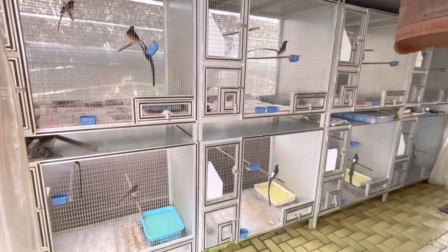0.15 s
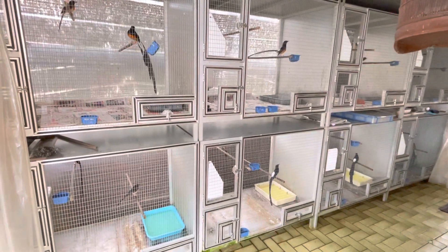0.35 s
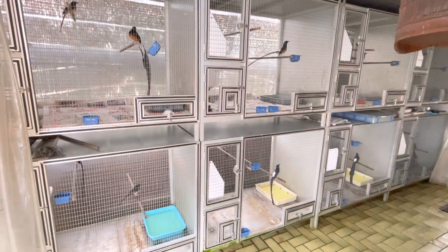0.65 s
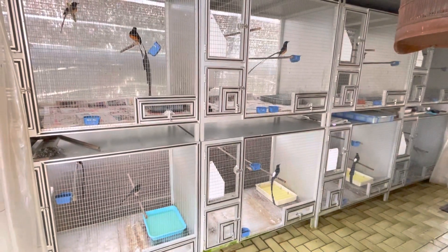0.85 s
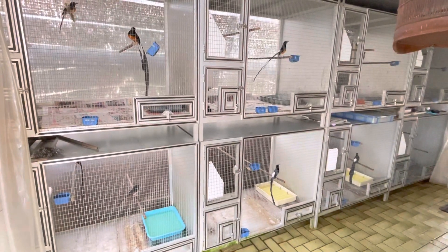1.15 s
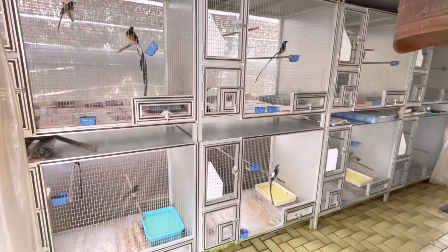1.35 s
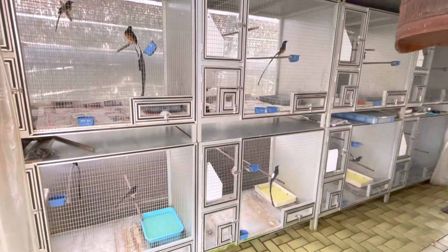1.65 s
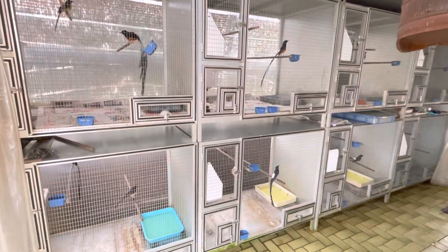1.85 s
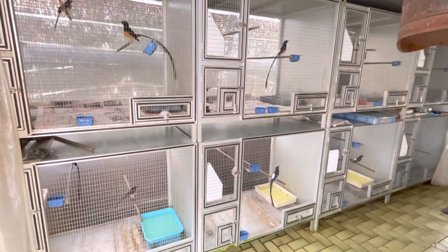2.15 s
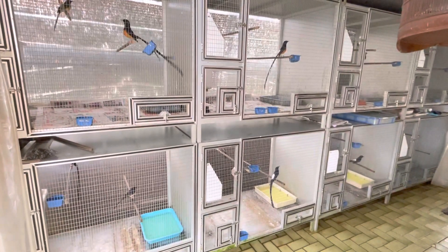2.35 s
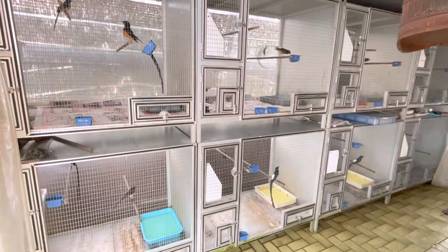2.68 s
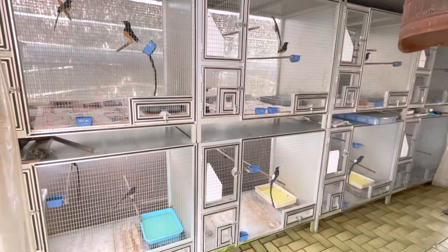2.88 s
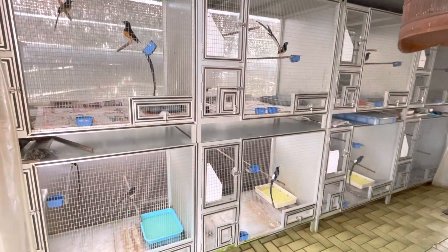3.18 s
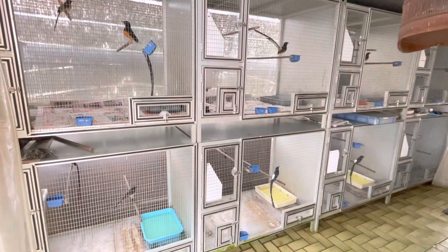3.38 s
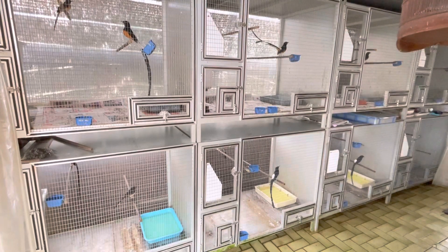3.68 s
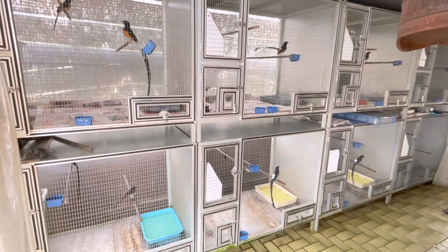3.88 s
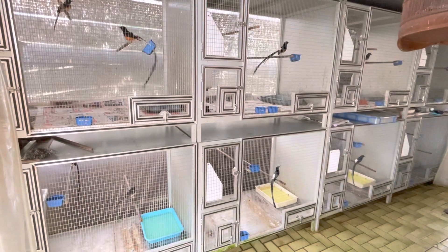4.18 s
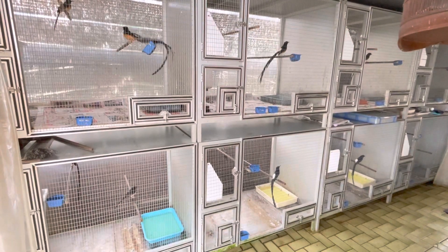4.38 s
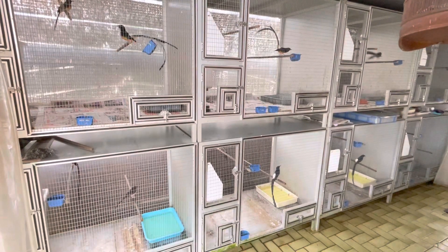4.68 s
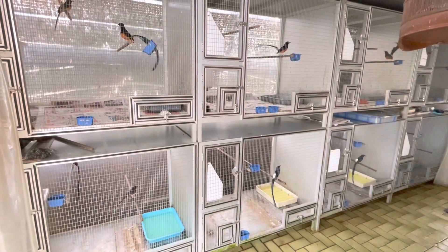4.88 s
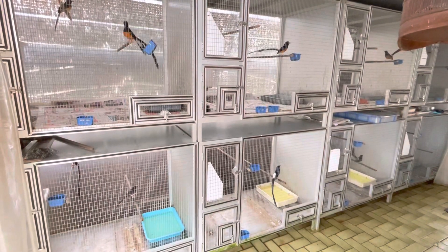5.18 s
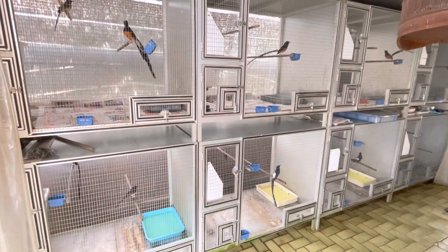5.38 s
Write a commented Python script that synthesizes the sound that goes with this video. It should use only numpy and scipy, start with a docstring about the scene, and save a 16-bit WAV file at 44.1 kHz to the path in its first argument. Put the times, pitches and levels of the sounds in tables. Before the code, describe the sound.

Several caged songbirds whistle, slur and chatter over one another in a hard-walled tiled room, above a low steady machine hum.

```python
"""Caged songbirds in a tiled room

Several long-tailed songbirds whistle, slur and chatter over each other, with a far twitter behind them.
Each note is a gliding, nearly pure tone with weak overtones that rings on between the hard walls.
Harsh buzzes and rasps come from fast pitch sweeps; the ticks, scrapes and wing rustles are shaped noise.
A machine hums steadily under it all as a few wavering sines over coloured room noise."""
import sys
import numpy as np
from scipy import signal
from scipy.fft import rfft, irfft, next_fast_len
from scipy.io import wavfile
from scipy.ndimage import map_coordinates

SR = 44100
rng = np.random.default_rng(int(sys.argv[2]) if len(sys.argv) > 2 else 0)


def bounce(signal):
    """Save signal as a 16-bit WAV file at the path given by the first command-line argument."""
    frames = np.transpose(np.atleast_2d(signal))
    limited = np.clip(frames, -1, 1)
    pcm = np.round(limited * 32767).astype(np.int16)
    wavfile.write(sys.argv[1], SR, pcm)


N = 243873  # length of the scene [samples]


def undb(db):
    """Decibels to amplitude gain."""
    return 10 ** (np.asarray(db) / 20)


def unit(x):
    """Scale to rms 1 over all channels."""
    return x / np.sqrt(np.mean(x ** 2))


def walk(rate, size):
    """Smooth random wander with a spread near 1, through `rate` random points per second."""
    knots = rng.standard_normal(int(size / SR * rate) + 3)
    positions = np.arange(size) / SR * rate
    return map_coordinates(knots, [positions], order=2, mode="nearest")


def colour(x, points):
    """Filter by a spectrum of (frequency [Hz], gain [dB]) points, joined along log frequency."""
    hz, db = np.transpose(points)
    size = next_fast_len(x.shape[-1])
    f = np.maximum(np.fft.rfftfreq(size, 1 / SR), 1)
    gain = undb(np.interp(np.log(f), np.log(hz), db))
    return irfft(rfft(x, size) * gain, size)[..., :x.shape[-1]]


def add(out, start, x):
    """Mix x into out at a time in seconds."""
    i = max(int(start * SR), 0)
    out[..., i:i + x.shape[-1]] += x[..., :max(N - i, 0)]


def pan(x, left_db):
    """Spread a mono sound over both channels, the left one louder by left_db."""
    return x * unit(undb([[left_db], [0]]))


def room(x, wet_db, cage_db, cage_s=0.0097, build_s=0.006, direct_db=-6.0):
    """Direct sound, quick reflections inside the cage and the diffuse ring of the tiled room."""
    t60_s, treble_t60_s, split_hz = 0.47, 0.34, 5000  # the treble dies away sooner
    port_lag_s = 0.00023  # the birds sit nearer to the right microphone port
    t = np.arange(int(.8 * SR)) / SR
    noise = rng.standard_normal((2, len(t)))
    low = signal.sosfilt(signal.butter(2, split_hz, fs=SR, output="sos"), noise)
    high = signal.sosfilt(signal.butter(2, split_hz, "high", fs=SR, output="sos"), noise)
    # the minus sign keeps the two bands from cancelling where they meet
    tail = low * undb(-60 * t / t60_s) - high * undb(-60 * t / treble_t60_s)
    tail = unit(tail * (1 - np.exp(-t / build_s)))
    # slaps off the cage walls: some come from the bird's side and reach both ports alike
    slaps = rng.standard_normal((3, len(t))) ** 3 * np.exp(-t / cage_s)
    cage = unit(slaps[:2] + 0.48 * slaps[2])
    response = (undb(wet_db) * tail + undb(cage_db) * cage) / np.sqrt(len(t))
    response[:, 0] += undb(direct_db)
    response[0] = np.roll(response[0], int(port_lag_s * SR))
    return signal.fftconvolve(x, response, axes=1)[:, :N]


def drone(trim_db=-1):
    """The deep tone of the machine slowly swells and sinks, wavering a little in pitch."""
    # slow course of the drone: (time [s], frequency [Hz], relative level [dB])
    course = [(0.0, 108.4, -43), (0.231, 112.4, -53), (0.73, 110.8, -55.5), (1.09, 111.1, -47),
              (2.57, 111.0, -48.5), (4.53, 110.9, -52), (5.499, 110.9, -43)]
    when, hz, db = np.transpose(course)
    time = np.arange(N) / SR
    phase = 2 * np.pi * np.cumsum(np.interp(time, when, hz) + .5 * walk(5.66, N)) / SR
    return undb(np.interp(time, when, db) + trim_db) * np.sin(phase)


def hum():
    """Further tones of the machine, each a sine wandering slightly in level and pitch."""
    # machine tones: (frequency [Hz], relative level [dB])
    tones = [(57, -55), (262, -48.5), (524, -64.5)]
    out = np.zeros(N)
    for hz, db in tones:
        level = undb(db + 1.5 * walk(13.0, N))
        phase = 2 * np.pi * np.cumsum(hz + .5 * walk(7.88, N)) / SR
        out += level * np.sin(phase)
    return out


def background(air_db=-42.5, wide_hz=600):
    """A steady machine hum over room noise whose bass is alike in both channels."""
    # spectrum of the room noise: (frequency [Hz], relative level [dB])
    air_colour = [(20, -27), (32, -11), (45, 4), (80, 2), (130, -3.5), (220, -3.5), (320, -7.5), (470, -11),
                  (900, -9.5), (1800, -8.5), (3000, -16), (5200, -27), (6300, -24), (7400, -31),
                  (8800, -24.5), (11000, -37), (15000, -38)]
    mid, side = colour(rng.standard_normal((2, N)), air_colour)
    side = signal.sosfilt(signal.butter(1, wide_hz, "high", fs=SR, output="sos"), side)
    air = undb(air_db) * unit(np.array([mid + side, mid - side]))
    machine = np.sqrt(2) * (hum() + drone())
    return air + machine * undb([[.7], [-.7]])  # slightly louder on the left


def syrinx(hz, pressure):
    """A nearly pure tone whose overtones grow when the bird pushes harder."""
    # overtones of the syrinx: (multiple of the pitch, relative level [dB])
    overtone_levels = [(2, -21.5), (3, -35), (4, -57), (5, -35)]
    # colour that beak and throat give the overtones: (frequency [Hz], gain [dB])
    beak = [(2000, -19), (5200, -14), (6300, -9), (7500, 1), (8900, 7), (10000, -3.5), (11300, -4.5),
            (13000, -2), (14700, -10)]
    phase = 2 * np.pi * np.cumsum(hz) / SR
    overtones = sum(undb(db) * np.sin(round(k) * phase)
                    for k, db in overtone_levels if k * hz.max() < SR / 2)
    return np.sqrt(2 * pressure) * (np.sin(phase) + pressure * colour(overtones, beak))


def buzzes(uneven=0.207, left_db=5, force=1.26, dull_hz=10200):
    """The pitch is shaken up and down so fast that the note smears into a rasp."""
    # harsh buzzes: (time [s], length [s], start [Hz], end [Hz], pitch swing [Hz],
    #                mean swing rate [1/s], level ahead of the room [dB])
    calls = [(0.0, 0.044, 5610, 4670, 430, 146, -31), (2.473, 0.031, 4506, 4320, 500, 155, -34),
             (2.496, 0.042, 3814, 2810, 605, 148, -33.5)]
    out = np.zeros(N)
    for start, length, start_hz, end_hz, swing_hz, rate, db in calls:
        size = int(length * SR)
        swings_per_s = rate * (1 + uneven * walk(198.3, size))
        shake = signal.sawtooth(2 * np.pi * np.cumsum(swings_per_s) / SR, .5)  # triangle
        hz = np.linspace(start_hz, end_hz, size) + swing_hz * shake
        note = syrinx(hz, force * signal.windows.tukey(size, .4))
        add(out, start, undb(db) * unit(note))
    out = signal.sosfilt(signal.butter(6, dull_hz, fs=SR, output="sos"), out)
    return room(pan(out, left_db), wet_db=-0.5, cage_db=-1.0)


def whistle(hz, crest, waver_hz=19, rasp=0.00067, harsh=0.015, flutter_db=2.0, edge=0.074, swell_db=5):
    """One note: the pitch follows its contour while the air pressure swells to its crest and falls."""
    size = len(hz)
    u = np.linspace(0, 1, size)
    # high notes that are whipped through a wide range turn rough
    sweep = np.clip(np.ptp(hz) * SR / size / 30000, 0, 1)
    strain = sweep ** 2 * np.clip((hz.max() - 3000) / 1500, 0, 1)
    # a held note wanders a little, so it beats against its own echoes
    hz = hz * (1 + (rasp + harsh * strain) * walk(700, size)) + waver_hz * walk(46.6, size)
    push = np.minimum(u / crest, (1 - u) / (1 - crest))
    db = swell_db * (push - .5) + flutter_db * walk(78.2, size)
    return syrinx(hz, np.sin(np.pi / 2 * push)) * signal.windows.tukey(size, edge) * undb(db)


def glide(length, start_hz, end_hz, bend):
    """Pitch from one note to another: bend 0 is straight, 1 levels off at the end, -1 starts level."""
    u = np.linspace(0, 1, int(length * SR))
    return start_hz + (end_hz - start_hz) * (u + bend * u * (1 - u))


def drop(length, top_hz, bottom_hz):
    """A fall that flicks up, tips over, plunges and levels off at the bottom."""
    hook_share, hook_s = 0.0928, 0.00606  # depth of the flick as a share of the pitch, and its time constant
    lateness = 1.32  # above 1 the plunge comes late
    u = np.linspace(0, 1, int(length * SR))
    hook = 1 - hook_share * np.exp(-u * length / hook_s)
    fall = np.sin(np.pi / 2 * u ** lateness) ** 2
    return hook * top_hz * (bottom_hz / top_hz) ** fall


def quiver(size, per_s=85, uneven=0.258):
    """Fast, uneven up-and-down shake of the pitch, between -1 and 1."""
    return np.sin(2 * np.pi * np.cumsum(per_s * (1 + uneven * walk(58.0, size))) / SR)


def song():
    """Yield each note as (time [s], sound, perch); every kind has its own contour and crest."""
    # Levels stand ahead of the swell, flutter and room; a crest is a share of the note's length.
    # held or evenly gliding: (time [s], length [s], start [Hz], end [Hz], level [dB], perch)
    whistles = [(0.0, 0.067, 2416, 2210, -36, "middle"), (0.199, 0.076, 2404, 2260, -36, "left"),
                (0.272, 0.19, 4450, 4120, -55, "left"), (0.279, 0.11, 1937, 2193, -28.5, "near"),
                (0.39, 0.18, 1910, 2045, -33, "near"), (0.444, 0.081, 2337, 2324, -32.5, "left"),
                (0.534, 0.14, 2096, 2410, -29, "back"), (0.655, 0.04, 3160, 3212, -25.5, "near"),
                (1.247, 0.025, 4470, 4430, -32, "left"), (3.527, 0.025, 2205, 1903, -29.5, "ahead"),
                (0.933, 0.1, 1427, 1440, -38, "back"), (1.574, 0.066, 2582, 2565, -30, "near"),
                (2.769, 0.054, 1403, 1215, -28.5, "middle"), (1.601, 0.16, 3640, 3200, -50, "middle"),
                (1.604, 0.12, 1978, 1950, -30, "ahead"), (1.744, 0.18, 3097, 2852, -28.5, "near"),
                (2.332, 0.085, 2168, 2027, -25.5, "ahead"), (2.452, 0.1, 2610, 2190, -41, "left"),
                (2.564, 0.15, 2273, 2502, -35.5, "left"), (2.66, 0.07, 1522, 1495, -37, "back"),
                (2.699, 0.165, 2496, 2694, -36, "back"), (2.774, 0.0526, 3730, 4200, -47, "near"),
                (3.4, 0.053, 5180, 5050, -50.5, "left"), (3.698, 0.041, 1795, 2114, -22.5, "middle"),
                (3.741, 0.058, 1998, 2750, -21.5, "middle"), (4.736, 0.23, 1577, 1496, -38, "ahead"),
                (5.12, 0.115, 2985, 2856, -26.5, "ahead"), (5.17, 0.092, 1727, 1608, -28.5, "near"),
                (5.429, 0.077, 1912, 1757, -25, "close")]
    # scoop up and level off: (time [s], length [s], start [Hz], top [Hz], level [dB], perch)
    upslurs = [(0.378, 0.06, 2680, 2947, -26.5, "close"), (0.547, 0.12, 3053, 3186, -26, "near"),
               (0.793, 0.071, 2660, 2925, -28.5, "close"), (0.928, 0.057, 1613, 1886, -34, "back"),
               (1.024, 0.037, 1877, 2070, -28.5, "near"), (1.167, 0.051, 2500, 3120, -37.5, "middle"),
               (1.221, 0.026, 3116, 3915, -33.5, "back"), (1.236, 0.045, 1620, 1812, -23, "middle"),
               (1.273, 0.24, 3390, 3804, -46, "back"), (1.356, 0.051, 1684, 1964, -25, "middle"),
               (1.447, 0.049, 2578, 2710, -26, "ahead"), (1.495, 0.09, 2400, 2557, -31.5, "middle"),
               (1.744, 0.052, 960, 1160, -37, "middle"), (2.57, 0.032, 1570, 1720, -34, "back"),
               (2.791, 0.21, 1985, 2563, -33, "back"), (2.993, 0.0404, 3300, 3826, -30, "middle"),
               (3.8, 0.19, 950, 1660, -35, "back"), (4.481, 0.012, 2190, 2840, -29, "near"),
               (4.767, 0.033, 1445, 2122, -25.5, "left"), (4.976, 0.11, 2107, 2916, -23, "left"),
               (5.358, 0.055, 1399, 1974, -23, "middle")]
    # tip over and drop: (time [s], length [s], top [Hz], bottom [Hz], level [dB], perch)
    downslurs = [(.862, 0.039, 2870, 2300, -40, "left"), (1.123, 0.046, 2198, 1815, -33, "back"),
                 (1.246, 0.032, 4520, 2820, -32, "left"), (1.918, 0.037, 1804, 1065, -33, "back"),
                 (2.33, 0.042, 2157, 1156, -36, "ahead"), (2.593, 0.038, 2243, 1440, -33, "back"),
                 (2.73, 0.05, 2054, 1243, -26, "middle"), (3.316, 0.13, 2413, 1061, -27, "back"),
                 (3.507, 0.05, 2445, 1728, -31.5, "ahead"), (3.945, 0.034, 3080, 2120, -28.5, "left"),
                 (4.051, 0.05, 4203, 2676, -26.5, "middle"), (4.204, 0.038, 4205, 2780, -30.5, "near"),
                 (4.21, 0.029, 2113, 1640, -30, "middle"), (4.32, 0.082, 2230, 1056, -30.5, "back"),
                 (4.789, 0.045, 2136, 1570, -32, "left"), (5.317, 0.08, 1700, 1035, -29.5, "back"),
                 (5.441, 0.049, 1794, 1136, -26, "middle")]
    # quiver while gliding: (time [s], length [s], start [Hz], end [Hz], pitch swing [Hz], level [dB], perch)
    warbles = [(1.818, 0.12, 1350, 1832, 125, -36, "middle"), (2.038, 0.11, 1500, 1866, 40, -30.5, "ahead"),
               (2.124, 0.081, 2082, 2167, 205, -32.5, "ahead"),
               (2.599, 0.059, 2050, 1740, 258, -37, "left"), (2.699, 0.07, 1913, 1951, 60, -30.5, "ahead"),
               (2.977, 0.023, 4975, 4800, 69.4, -29, "left"), (2.979, .15, 2880, 3200, 25, -31, "near"),
               (3.065, 0.053, 3970, 4034, 55, -31, "middle"),
               (3.126, 0.086, 3590, 3298, 44.5, -31.5, "middle"),
               (3.164, 0.081, 3195, 3280, 25.2, -33.5, "near"), (3.344, .085, 2280, 1504, 236, -28, "back"),
               (3.82, 0.0753, 2950, 3440, 50, -34.5, "middle"),
               (3.927, 0.031, 2886, 3005, 110, -25, "ahead"), (4.554, .022, 3290, 3170, 328, -31, "near"),
               (4.625, 0.03, 2098, 2300, 109, -27, "middle")]
    # short arched chips: (time [s], top pitch [Hz], level [dB], perch)
    chips = [(0.412, 2960, -28, "near"), (0.984, 1472, -34, "close"), (1.064, 1470, -28.5, "close"),
             (1.121, 1465, -27.5, "close"), (1.426, 2005, -24.5, "ahead"), (1.759, 2648, -27, "middle"),
             (2.101, 1018, -41, "middle"), (2.239, 1066, -39.5, "middle"), (2.368, 1164, -32.5, "middle"),
             (3.685, 2327, -31, "middle"), (3.815, 1048, -33.5, "middle"), (4.119, 1029, -38, "middle"),
             (4.25, 1246, -29.5, "middle"), (4.896, 2994, -41, "back")]

    for start, length, start_hz, end_hz, db, perch in whistles:
        hz = glide(length, start_hz, end_hz, bend=0)
        yield start, undb(db) * whistle(hz, crest=0.53), perch
    for start, length, start_hz, top_hz, db, perch in upslurs:
        hz = glide(length, start_hz, top_hz, bend=.85)
        yield start, undb(db) * whistle(hz, crest=0.76), perch
    for start, length, top_hz, bottom_hz, db, perch in downslurs:
        hz = drop(length, top_hz, bottom_hz)
        yield start, undb(db) * whistle(hz, crest=0.3), perch
    for start, length, start_hz, end_hz, swing_hz, db, perch in warbles:
        hz = glide(length, start_hz, end_hz, bend=0.588)
        yield start, undb(db) * whistle(hz + swing_hz * quiver(len(hz)), crest=0.57), perch
    chip_s, droop = 0.022, 0.058  # both ends of a chip lie under its top by this share
    arch = 1 - droop * np.linspace(-1, 1, int(chip_s * SR)) ** 2
    for start, hz, db, perch in chips:
        yield start, undb(db) * whistle(hz * arch, crest=0.52), perch


def birds():
    """Each perch has its own direction, share of direct sound and echoes."""
    # where the birds sit: label -> (left minus right [dB], direct sound [dB])
    # the labels are only keys: all perches lean left, and "left" is the most echoing one
    perches = {"close": (5.6, 1.8), "near": (6.9, 0.4), "left": (5.1, -9.5), "ahead": (2.8, 0.53),
               "middle": (3.8, -3), "back": (3.1, -5.5)}
    voices = {perch: np.zeros(N) for perch in perches}
    for start, note, perch in song():
        add(voices[perch], start, note)
    return sum(room(pan(voices[perch], left_db), wet_db=1.5, cage_db=-1.0, direct_db=direct_db)
               for perch, (left_db, direct_db) in perches.items())


def far_chatter(count=100, chatter_db=-46):
    """Birds in distant cages blur into a soft twitter, heard mostly through the room."""
    out = np.zeros(N)
    for when, length, pitch, bend, fall in rng.random((count, 5)):
        start_hz = 1450 * 2 ** (.8 * pitch)
        end_hz = start_hz * (1 + .5 * (fall - .5))
        contour = glide(0.0615 + 0.091 * length, start_hz, end_hz, 2 * bend - 1)
        add(out, when * N / SR, whistle(contour, crest=0.95))
    return undb(chatter_db) * unit(room(np.array([out, out]), wet_db=39, cage_db=-1))


def rustles(grain_db=5, stroke_db=5.0):
    """Feathers brush in short grainy bursts; low, middle and high bands each flicker on their own."""
    # rustles of wings: (time [s], length [s], level ahead of taper and room [dB])
    bursts = [(1.228, 0.068, -53.5), (2.481, 0.068, -49.5), (2.679, 0.088, -47), (2.874, 0.093, -46),
              (2.966, 0.073, -45.5), (3.066, 0.096, -54), (3.201, 0.12, -46), (3.612, 0.13, -45),
              (3.906, 0.084, -51), (4.06, 0.24, -59), (4.439, 0.076, -50.5), (4.498, 0.085, -42),
              (4.921, 0.036, -46), (5.129, 0.077, -50)]
    # colour of the rustle: (frequency [Hz], relative gain [dB])
    rustle_colour = [(1200, -18), (3000, 5), (4900, -0.5), (5500, -6), (6300, 7), (7400, -7), (8600, -2),
                     (10500, -13.5), (13000, -17.5), (15000, -11)]
    bands = [(1000, 4500), (4500, 8000), (8000, 17000)]  # [Hz]
    out = np.zeros(N)
    for start, length, db in bursts:
        size = int(length * SR)
        brush = np.zeros(size)
        for edges in bands:
            grain = unit(undb(grain_db * walk(310.0, size) + stroke_db * walk(65, size)))
            band = signal.butter(2, edges, "band", fs=SR, output="sos")
            brush += signal.sosfilt(band, rng.standard_normal(size) * grain)
        burst = unit(colour(brush, rustle_colour)) * signal.windows.tukey(size, .4)
        add(out, start, undb(db) * burst)
    return room(np.array([out * undb(6), out]), wet_db=1.5, cage_db=2.0, direct_db=-3.0)


def rasps(droop=0.352, upper_db=-6.5, rough=0.012, force=2.2, left_db=5):
    """Both sides of the syrinx are whipped up and down within milliseconds; the walls smear the streak."""
    # stuttered syllables: (time [s], length [s], top of lower voice [Hz], top of upper voice [Hz],
    #                       level of both voices together, ahead of the room [dB])
    syllables = [(1.238, 0.019, 3320, 4430, -38), (4.502, .018, 3280, 4730, -26.5),
                 (4.5265, 0.0136, 3650, 4770, -23.5), (4.547, .011, 3590, 4590, -19.5),
                 (4.567, .016, 3380, 4600, -27.5)]
    out = np.zeros(N)
    for start, length, lower_hz, upper_hz, db in syllables:
        size = int(length * SR)
        arch = 1 - droop * np.linspace(-1, 1, size) ** 2
        pressure = force * signal.windows.tukey(size, .3)
        lower = syrinx(lower_hz * arch * (1 + rough * walk(780, size)), pressure)
        upper = syrinx(upper_hz * arch * (1 + rough * walk(780, size)), pressure)
        add(out, start, undb(db) * unit(lower + undb(upper_db) * upper))
    return room(pan(out, left_db), wet_db=-3, cage_db=0.0, direct_db=-4.5)


def ticks(decay_s=0.0032, tick_db=-6):
    """Dry little snaps of beaks and claws that rattle briefly round the cage."""
    # snaps: (time [s], level ahead of tick_db and the room [dB])
    snaps = [(1.466, -30.5), (1.8028, -22), (2.0067, -23), (2.2467, -30), (4.154, -23), (4.3776, -23),
             (4.709, -22), (4.973, -20), (5.173, -25)]
    # colour of a snap: (frequency [Hz], relative gain [dB])
    snap_colour = [(1200, -2.5), (3000, 1.5), (5200, 5.5), (6400, 12.5), (8500, -3.5), (11000, -7),
                   (15000, -10)]
    out = np.zeros(N)
    t = np.arange(int(0.063 * SR)) / SR
    for start, db in snaps:
        noise = unit(colour(rng.standard_normal(len(t)), snap_colour))
        add(out, start, undb(db + tick_db) * noise * np.exp(-t / decay_s))
    return room(np.array([out, out]), wet_db=-5.5, cage_db=5.5, cage_s=0.012)


def scratches(decay_s=0.028, grain_db=5):
    """A bird scrabbles on its perch: claws catch and skid to a stop in a spray of tiny snaps."""
    # one scrape per grip of the claws: (time [s], level ahead of decay and room [dB])
    scrapes = [(4.722, -32.5), (4.741, -31), (4.774, -33.5), (4.787, -41)]
    # colour of a scrape: (frequency [Hz], relative gain [dB])
    scrape_colour = [(1400, -20), (2500, -3), (3700, -5.5), (4950, 0), (6060, -3.5), (7500, -15.5),
                     (9000, -6), (10900, -24), (15200, -28)]
    out = np.zeros(N)
    t = np.arange(int(.1 * SR)) / SR
    for start, db in scrapes:
        snaps = rng.standard_normal(len(t)) * undb(grain_db * walk(700, len(t)))
        add(out, start, undb(db) * unit(colour(snaps, scrape_colour)) * np.exp(-t / decay_s))
    return room(np.array([out * undb(3), out]), wet_db=1, cage_db=1.5)


def scene():
    """The room's hum, near and far song, and the noises from the cages."""
    calls = buzzes() + birds() + far_chatter() + rasps()
    cage_noises = rustles() + ticks() + scratches()
    return background() + calls + cage_noises


def record(dry, top_hz=15800):
    """The recorder cuts the top with a steep low-pass."""
    return signal.sosfilt(signal.ellip(10, .2, 80, top_hz, fs=SR, output="sos"), dry)


dry = scene()
out = record(dry)
bounce(out)
```